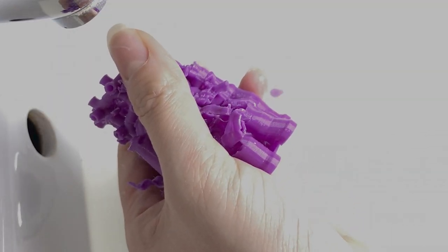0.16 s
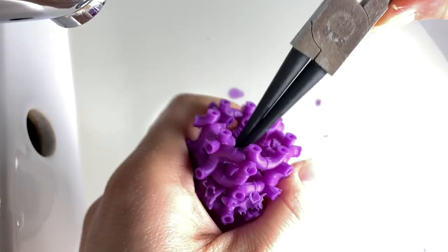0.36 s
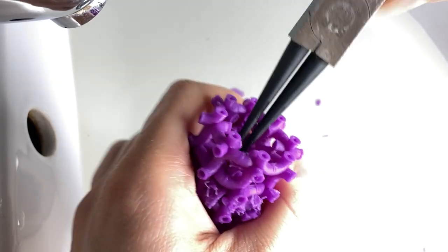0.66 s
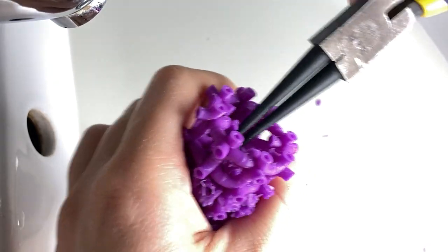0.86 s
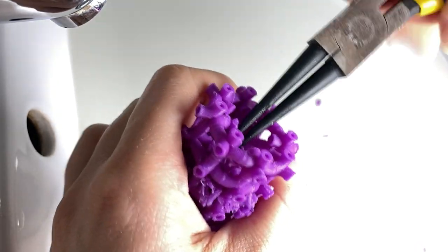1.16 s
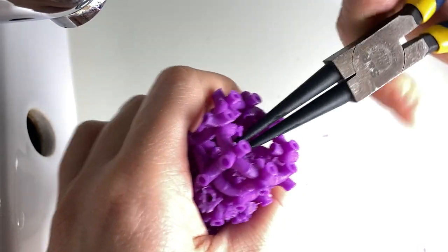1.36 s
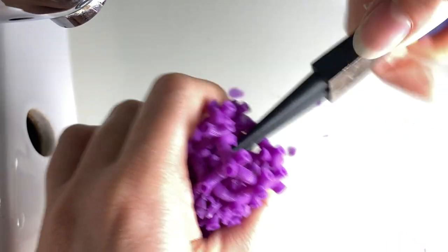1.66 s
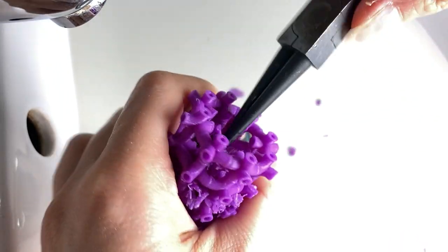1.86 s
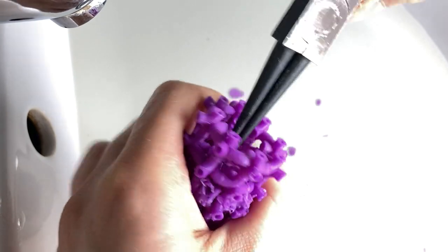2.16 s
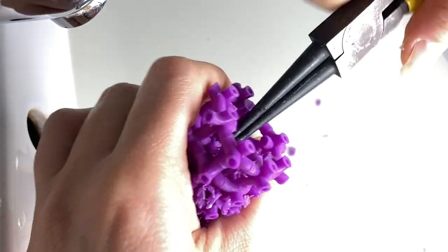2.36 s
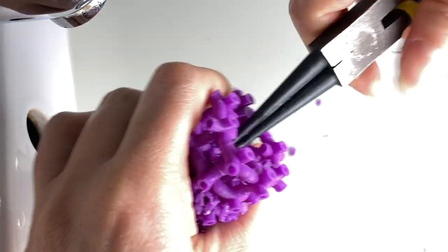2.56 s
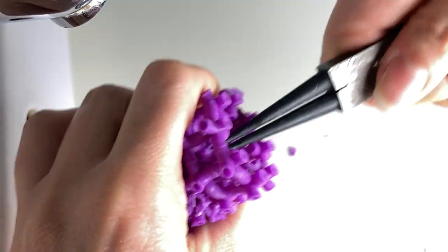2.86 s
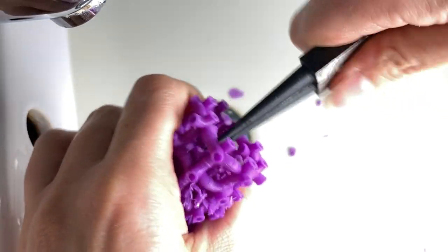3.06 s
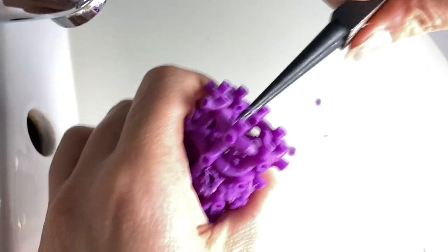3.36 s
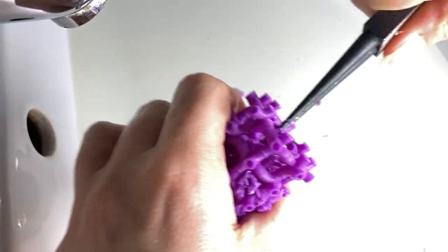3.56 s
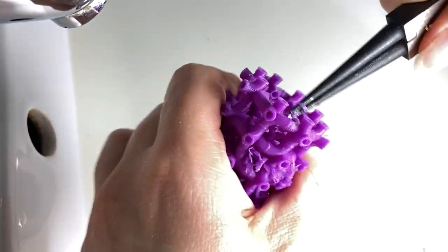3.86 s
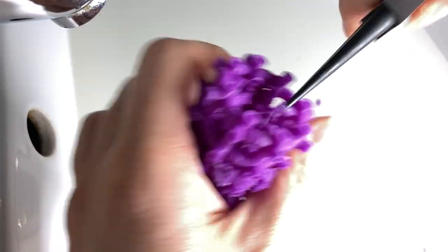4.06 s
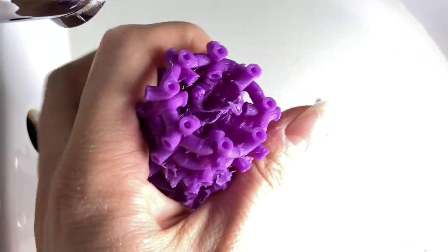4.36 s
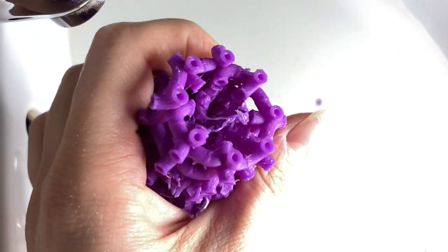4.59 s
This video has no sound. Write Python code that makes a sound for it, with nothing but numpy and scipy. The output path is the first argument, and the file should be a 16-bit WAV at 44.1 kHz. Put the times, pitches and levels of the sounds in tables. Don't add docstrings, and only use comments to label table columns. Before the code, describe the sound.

Close to the microphone, pliers tick on a hollow plastic part and snap its thin supports: a burst of sharp cracks early, sparse small clicks and faint scrapes in the middle, then loud snaps and a crunch just after three seconds, a softer crunch at four, and finally a fragment clattering into a basin. A quiet low fan hum runs throughout in a small room.

```python
import sys
import numpy as np
from scipy import signal
from scipy.fft import rfft, irfft
from scipy.io import wavfile
from scipy.ndimage import uniform_filter1d

SR = 44100
rng = np.random.default_rng(int(sys.argv[2]) if len(sys.argv) > 2 else 0)


def attenuation_scalar(level_db):
    decades = np.asarray(level_db, float) / 20
    return 10 ** decades


def transcribe(signal):
    frames = np.atleast_2d(signal).T
    limited = np.clip(frames, -1, 1)
    pcm = np.round(limited * 32767).astype(np.int16)
    wavfile.write(sys.argv[1], SR, pcm)


N = 208548

# f/Hz, density/dB per Hz
AIR_SPECTRUM = [(21, -33.5), (35, -18.5), (91, 1), (124, 1), (212, -7), (329, -17), (472, -20), (551, -31),
                (713, -22), (790, -28.5), (1620, -31.5), (2270, -30), (2860, -31), (14900, -51),
                (16500, -45)]
AIR_DB = -55.5
# f/Hz, width/Hz, level/dB
DUCT_MODES = [(2230, 450, -79.5), (2250, 51, -81), (2710, 60, -91), (469, 70, -73), (720, 120, -80),
              (907, 67, -86.5)]
FAN_SHAFT_HZ = 31
# shaft order, level/dB
FAN_ORDERS = [(2, -62), (3, -61), (4, -59), (6, -63), (7, -67.5), (9, -76.5)]
# t/s, rustle level/dB
GRIP_LEVELS = [(0.0, -76), (0.13, -75), (0.28, -63), (0.41, -77), (1.25, -72), (1.41, -73), (1.58, -77),
               (2.42, -73), (2.57, -76), (3.15, -73.5), (3.28, -70), (3.34, -78.5), (3.87, -81),
               (4.08, -65.5), (4.21, -78), (4.73, -76.5)]

# f/Hz, width/Hz
STRUT_MODES = [(4750, 810), (5500, 330), (6300, 180), (7150, 100), (8000, 110), (10200, 480)]
TUBE_HZ, TUBE_WIDTH_HZ = 3150, 300
# t/s, peak level/dB, brightest f/Hz, tube ring/dB re peak
TICK_EVENTS = [(0.045, -54.5, 5430, -5), (0.3114, -41, 5040, -17), (0.5275, -52.5, 4400, 0),
               (0.9597, -52, 5000, -15), (1.2116, -46, 7800, -25), (1.2266, -52, 5010, -17),
               (1.688, -56, 6160, -13), (1.735, -55, 9420, -8), (1.8043, -40.5, 10300, -30),
               (1.8462, -45, 4840, -15), (1.9536, -42.5, 4300, -9), (1.9699, -43.5, 4600, -4.5),
               (2.0142, -53, 7290, -7), (2.0358, -46, 4600, -17), (2.579, -52.5, 4790, -8),
               (2.7754, -40.5, 8800, -11.5), (2.791, -40, 9100, -8.5), (2.8404, -44, 7900, -26),
               (2.9118, -52, 9550, -26.5), (3.19, -40, 11040, -6), (3.7717, -44.5, 6200, -31),
               (3.8613, -46, 10300, -11), (3.908, -56, 6100, -18), (3.9254, -53, 7610, -12),
               (3.947, -42.5, 6600, -6), (4.2183, -47, 4770, 1), (4.2653, -49, 6100, -10),
               (4.2745, -48, 6570, -12), (4.4473, -54.5, 5400, -19), (1.2625, -53, 11000, -25)]
TICK_TOP_DB, TICK_T60_S = -5, 0.013
# t/s, peak level/dB, brightest f/Hz, tube ring/dB re peak, airy top/dB re peak
BREAK_EVENTS = [(0.2972, -38, 4080, -11, 0), (0.2994, -22, 6840, -12, -15), (0.3387, -19.5, 7200, -15, -8),
                (0.3562, -22, 6340, -1, -15), (0.4383, -22.5, 6100, -30, 6.5), (0.4406, -16, 6630, -5, -8),
                (0.499, -36, 4700, -9, -23), (0.616, -31, 6800, -6.5, -14),
                (1.1589, -36.5, 11100, -14.5, -4), (2.4021, -37.5, 11000, -30, -8),
                (2.6487, -33, 5640, -30, -25), (3.0406, -41.5, 8690, -10, 14),
                (3.0445, -19.5, 10400, -6, 2), (3.0783, -32.5, 5170, -6.5, -14),
                (3.1628, -39, 6900, -3.5, -24), (3.1928, -15.5, 8470, -8.5, -12),
                (3.2146, -21.5, 7300, -6.5, -16), (3.5651, -32, 5000, -9, -12),
                (3.9742, -28, 10000, -25, -14), (3.9974, -35, 5800, -13, 2), (4.2093, -38.5, 6900, -1, -16)]
BREAK_T60_S, TEAR_S_PER_DB = 0.014, 0.0004
# t/s, peak level/dB, brightest f/Hz, tube ring/dB re peak
CRUNCH_EVENTS = [(3.248, -22, 7640, -29), (3.2559, -21.5, 7700, -8.5), (3.2602, -21.5, 4070, -7.5),
                 (3.2636, -34, 4130, 1), (3.2732, -26, 8100, -11), (4.0593, -35.5, 9050, -11),
                 (4.0663, -39.5, 5200, -3.5), (4.0751, -38, 5500, -8), (4.081, -35, 5600, -10),
                 (4.0855, -29, 5500, -6), (4.0991, -37, 8120, -8), (4.1124, -54, 5560, -8)]
CRUNCH_TOP_DB, CRUNCH_T60_S = -13, 0.024

# f/Hz, t60/s
ROOM_DECAY = [(800, 0.15), (3000, 0.15), (7000, 0.11), (15000, 0.11)]
ROOM_DB = -13.5
# f/Hz, width/Hz, boost (ratio)
BASIN_HOLLOW = (3150, 240, .14)

# t/s, length/s,
# level/dB, centre f/Hz
SLIP_EVENTS = [(0.094, 0.053, -53, 10800), (0.454, 0.046, -59, 9000), (0.638, 0.031, -61, 9200),
               (0.71, 0.021, -61, 8200), (0.73, 0.032, -52, 9600), (0.77, 0.086, -69.5, 5640),
               (0.896, 0.043, -65, 7400), (1.038, 0.051, -60.5, 4700), (1.134, .03, -66, 9900),
               (1.153, 0.012, -59, 4970), (1.243, 0.16, -64, 10800), (1.404, 0.058, -66.5, 10700),
               (1.514, 0.098, -64.5, 10600), (1.613, 0.054, -69.5, 4900), (2.155, 0.051, -65, 4300),
               (2.36, 0.075, -62, 12100), (2.452, 0.055, -54, 11000), (2.64, 0.065, -54.5, 5600),
               (2.732, 0.037, -64, 11900), (2.788, 0.017, -58, 10100), (2.87, 0.03, -64, 11800),
               (2.952, .06, -69, 12000), (3.249, 0.023, -42, 7860), (3.88, 0.085, -72, 9000),
               (3.997, 0.024, -55, 11000), (4.052, 0.024, -54, 9000), (4.084, 0.03, -52.5, 5400),
               (4.43, 0.1, -73.5, 11000), (4.572, 0.03, -64, 8000)]

# t/s, peak level/dB, f/Hz, t60/s
KNOCK_EVENTS = [(0.257, -41, 1050, 0.0091), (0.356, -46, 980, 0.0099), (0.441, -44, 1400, 0.027),
                (0.738, -53.5, 1170, 0.02), (2.399, -58, 716, 0.02), (2.669, -54.5, 790, 0.029),
                (2.794, -65, 552, 0.02), (3.0448, -35, 760, 0.008), (3.163, -49, 573, 0.011),
                (3.193, -33.5, 1050, 0.014), (3.215, -44, 935, 0.016), (3.248, -47, 980, 0.02),
                (3.259, -37, 1000, 0.03), (3.947, -45, 560, 0.036), (4.059, -46.5, 890, 0.037),
                (4.067, -49, 980, 0.037), (4.077, -43.5, 920, 0.036), (4.086, -42.5, 1330, 0.033)]
# t/s, peak level/dB, f/Hz
BRANCH_EVENTS = [(0.2995, -40, 2700), (0.3566, -29, 2500), (0.4412, -21.5, 2150), (0.616, -42, 2470),
                 (0.9592, -50, 2030), (1.9535, -47.5, 2480), (1.97, -50, 2100), (3.0448, -29.5, 2000),
                 (3.1628, -43, 1740), (3.1925, -28, 2120), (3.214, -49, 2150), (3.2719, -41, 2300),
                 (3.566, -49.5, 2520), (4.0856, -46, 1790), (4.21, -55, 2230)]
BRANCH_T60_S = 0.021

# t/s, level/dB, f/Hz, t60/s
FAR_BUMP = (4.402, -44, 238, .13)

# t/s, peak level/dB
BOUNCE_EVENTS = [
    (4.5688, -27),
    (4.582, -36),
    (4.5875, -44),
    (4.597, -52),
    (4.636, -62),
]
# f/Hz, width/Hz, level/dB
BASIN_MODES = [(1700, 150, -14), (2000, 300, -10), (4400, 700, -3), (5500, 260, -8), (8150, 260, 0),
               (10300, 350, -1), (13500, 1500, -14)]
IMPACT_T60_S, IMPACT_DB = 0.011, -9


def evened(x):
    return x / np.sqrt(np.mean(x ** 2) + 1e-20)


def peaked(x):
    return x / abs(x).max()


def read(points, f_hz):
    table_hz, value = np.transpose(points)
    return np.interp(np.log(f_hz + 1), np.log(table_hz + 1), value)


def add(mix, t_s, sound):
    part = mix[round(t_s * SR):][:len(sound)]
    part += sound[:len(part)]


def resonate(x, f_hz, width_hz):
    turn = np.exp(2j * np.pi * f_hz * np.arange(len(x)) / SR)
    pole = np.exp(-np.pi * abs(width_hz) / SR)
    smooth = signal.lfilter([1 - pole], [1, -pole], x / turn)
    return 2 * (turn * smooth).real


def treble(x, f_hz):
    return signal.sosfilt(signal.butter(2, f_hz, "high", fs=SR, output="sos"), x)


def band(x, order, low_hz, high_hz):
    return signal.sosfilt(signal.butter(order, [low_hz, high_hz], "band", fs=SR, output="sos"), x)


def fading(noise, t60_s):
    t_s = np.arange(len(noise)) / SR
    decay = attenuation_scalar(-60 * t_s / np.clip(t60_s, 0.004, 0.1))
    return noise * decay * np.minimum(t_s / 0.0004, 1)


def grit(count, spread_db):
    ticks = evened(uniform_filter1d(rng.standard_normal(count), size=24))
    clumps = evened(uniform_filter1d(rng.standard_normal(count), size=160))
    return evened(rng.standard_normal(count) * attenuation_scalar(spread_db * (ticks + 0.6 * clumps)))


def room_air():
    f_hz = np.fft.rfftfreq(N, 1 / SR)
    air = irfft(rfft(rng.standard_normal(N)) * attenuation_scalar(read(AIR_SPECTRUM, f_hz)), N)
    out = attenuation_scalar(AIR_DB) * evened(air)
    for mode_hz, width_hz, db in DUCT_MODES:
        out += attenuation_scalar(db) * evened(resonate(rng.standard_normal(N), mode_hz, width_hz))
    return out


def fan():
    out, t_s = np.zeros(N), np.arange(N) / SR
    for order, db in FAN_ORDERS:
        f_hz = order * FAN_SHAFT_HZ
        steady = np.sin(2 * np.pi * (f_hz * t_s + rng.random()))
        fringe = resonate(resonate(rng.standard_normal(N), f_hz, 4.5), f_hz, 13.0)
        out += attenuation_scalar(db) * (steady + 0.6 * evened(fringe))
    return out


def grip():
    grip_s, level_db = np.transpose(GRIP_LEVELS)
    rustle = treble(treble(grit(count=N, spread_db=1.5), 4500), 3000)
    return attenuation_scalar(np.interp(np.arange(N) / SR, grip_s, level_db) - 1.0) * evened(rustle)


def snap(f_hz, tube_db, top_db, t60_s, noise, reach):
    burst = fading(noise, t60_s)
    ringing = np.zeros(len(noise))
    for (strut_hz, width_hz), strut_reach in zip(STRUT_MODES, reach):
        nearness = strut_reach / (1 + (np.log(strut_hz / f_hz) / 0.25) ** 2)
        ringing += nearness * resonate(burst, strut_hz, width_hz)
    crack = 0.5 * resonate(burst, 13000, 9600) + resonate(burst, f_hz, 0.11 * f_hz)
    body = band(crack + 1.3 * ringing, 2, 3700, 11500)
    top = band(fading(noise[::-1], t60_s), 3, 11000, 17000)
    puff = resonate(fading(noise, 0.6 * t60_s), TUBE_HZ, TUBE_WIDTH_HZ)
    tube = resonate(puff, 0.96 * TUBE_HZ, 1300)
    return peaked(body) + (0.14 + attenuation_scalar(top_db)) * peaked(top) + attenuation_scalar(tube_db) * peaked(tube)


def snaps():
    rows = [(*row, TICK_TOP_DB, TICK_T60_S) for row in TICK_EVENTS]
    rows += [(*row, BREAK_T60_S - TEAR_S_PER_DB * (row[1] + 20)) for row in BREAK_EVENTS]
    rows += [(*row, CRUNCH_TOP_DB, CRUNCH_T60_S) for row in CRUNCH_EVENTS]
    out = np.zeros(N)
    reaches = rng.uniform(0.13, 1.05, (len(rows), len(STRUT_MODES)))
    tearing = grit(count=len(rows) * 3000, spread_db=2.5).reshape(len(rows), -1)
    for (t_s, db, *colour), noise, reach in zip(rows, tearing, reaches):
        add(out, t_s, attenuation_scalar(db - 1.4) * snap(*colour, noise, reach))
    return out


def room(x):
    count = SR // 2
    taps = rng.choice([-1., 1.], count) * (rng.random(count) < 0.15) * (np.arange(count) > 90)
    f_hz, t_s, z = signal.stft(taps, SR, nperseg=128)
    decay = attenuation_scalar(-60 * t_s / read(ROOM_DECAY, f_hz)[:, None])
    tail = signal.istft(z * decay, SR, nperseg=128)[1]
    hollow_hz, width_hz, boost = BASIN_HOLLOW
    tail = tail + boost * resonate(tail, hollow_hz, width_hz)
    return signal.fftconvolve(x, tail / np.linalg.norm(tail))[:N]


def slips():
    out, source = np.zeros(N), grit(count=N, spread_db=2.1)
    ridge_ratios = rng.uniform(0.6, 1.35, (len(SLIP_EVENTS), 4))
    for (t_s, length_s, db, f_hz), ratios in zip(SLIP_EVENTS, ridge_ratios):
        piece = source[round(t_s * SR):][:round(1.3 * length_s * SR)]
        hiss = 0.6 * piece + resonate(piece, f_hz, 0.21 * f_hz)
        hiss += 0.5 * resonate(piece, TUBE_HZ, 900) + 0.65 * resonate(piece, 4600, 930)
        hiss += 0.41 * treble(piece, 10000)
        ridges = sum(resonate(piece, ratio * f_hz, 500) for ratio in ratios)
        hiss = treble(hiss + 0.9 * ridges, 2200)
        u = np.linspace(0, 1, len(piece))
        swell = peaked(u ** 1.18 * (1 - u) ** 2.35)
        add(out, t_s, attenuation_scalar(db) * evened(hiss) * swell)
    return out


def knocks():
    out = np.zeros(N)
    rows = list(KNOCK_EVENTS) + [(*row, BRANCH_T60_S) for row in BRANCH_EVENTS]
    blow = 16. * (np.arange(3000) == 20)
    for (t_s, db, f_hz, t60_s), noise in zip(rows, rng.standard_normal((len(rows), 3000))):
        jolt = resonate(fading(noise + blow, t60_s), f_hz, 0.45 * f_hz)
        jolt = resonate(jolt, f_hz, 1.3 * f_hz)
        add(out, t_s, attenuation_scalar(db + 1.06) * peaked(jolt))
    return out


def far_bump():
    out, t_s = np.zeros(N), np.arange(8000) / SR
    start_s, db, f_hz, t60_s = FAR_BUMP
    tone = np.sin(2 * np.pi * f_hz * t_s) * np.minimum(t_s / 0.007, 1)
    add(out, start_s, attenuation_scalar(db - 60 * t_s / t60_s) * tone)
    return out


def dropped_piece():
    out = np.zeros(N)
    for (t_s, db), noise in zip(BOUNCE_EVENTS, rng.standard_normal((len(BOUNCE_EVENTS), 2000))):
        blow = fading(noise, IMPACT_T60_S)
        ring = np.zeros(len(blow))
        for f_hz, width_hz, mode_db in BASIN_MODES:
            ring += attenuation_scalar(mode_db) * peaked(resonate(blow, f_hz, width_hz))
        impact = attenuation_scalar(IMPACT_DB) * peaked(treble(blow, 2500))
        add(out, t_s, attenuation_scalar(db) * peaked(ring + impact))
    return out


def scene():
    near = treble(snaps() + slips() + knocks() + dropped_piece(), 670)
    far = room_air() + fan() + far_bump()
    return (near + attenuation_scalar(ROOM_DB) * room(near) + grip() + far)[None]


def top_cut(x):
    return signal.sosfilt(signal.butter(12, 17000, fs=SR, output="sos"), x)


def record(dry):
    dry = signal.sosfilt(signal.butter(3, 54, "high", fs=SR, output="sos"), dry)
    low = signal.oaconvolve(dry, signal.firwin(511, 15850, fs=SR)[None], "same")
    wide = signal.oaconvolve(dry, signal.firwin(511, 16700, fs=SR)[None], "same")
    above_edge_db = -30
    return top_cut(low + attenuation_scalar(above_edge_db) * (wide - low))


dry = scene()
out = record(dry)
transcribe(out)
```